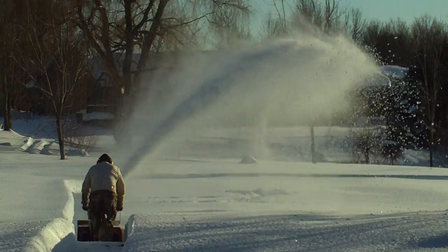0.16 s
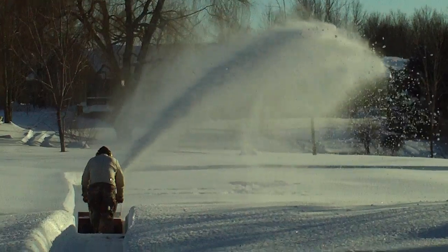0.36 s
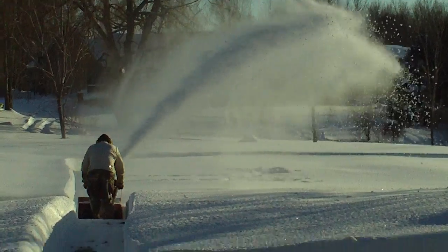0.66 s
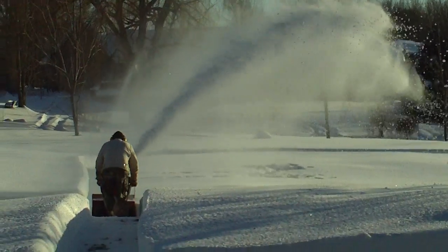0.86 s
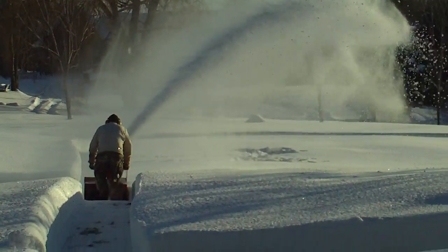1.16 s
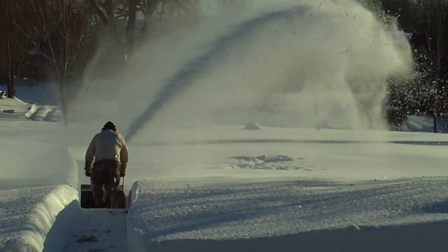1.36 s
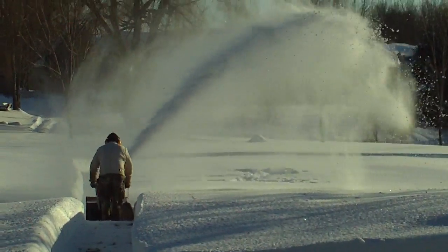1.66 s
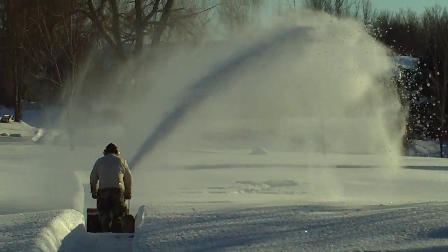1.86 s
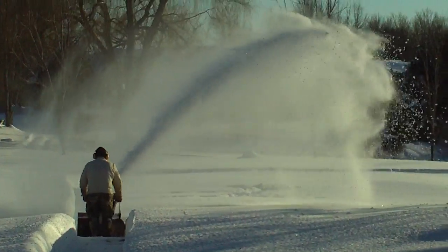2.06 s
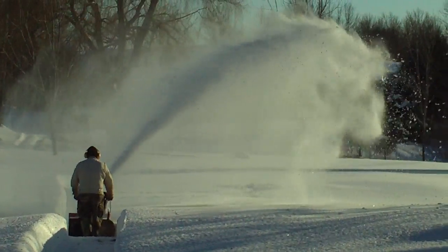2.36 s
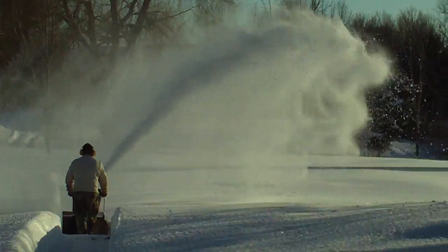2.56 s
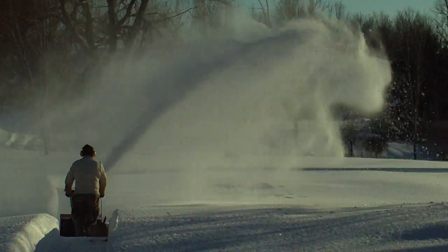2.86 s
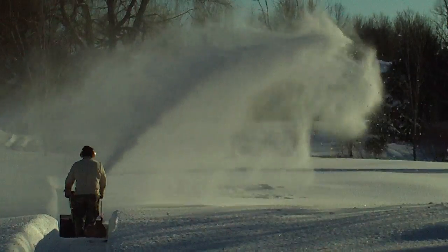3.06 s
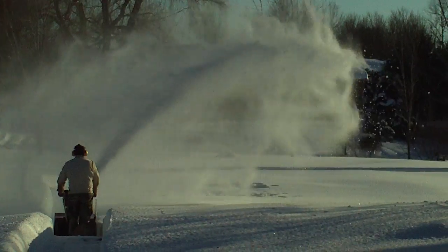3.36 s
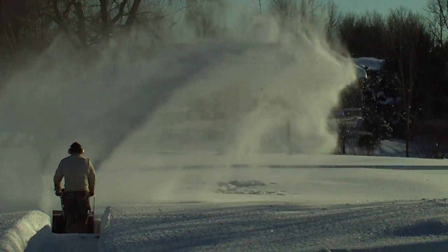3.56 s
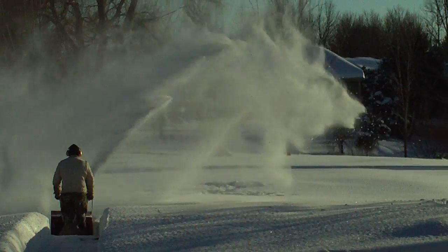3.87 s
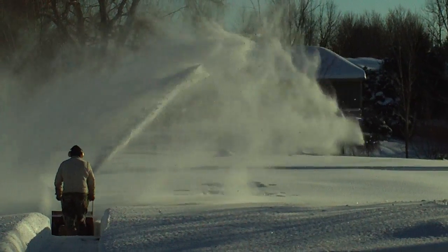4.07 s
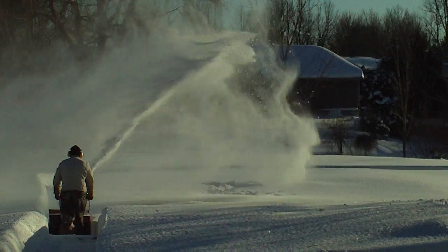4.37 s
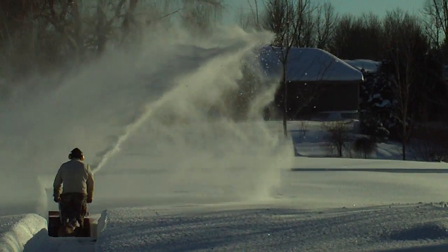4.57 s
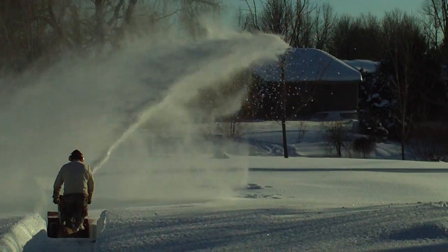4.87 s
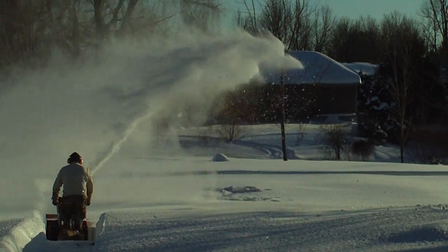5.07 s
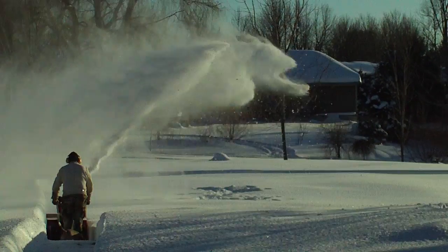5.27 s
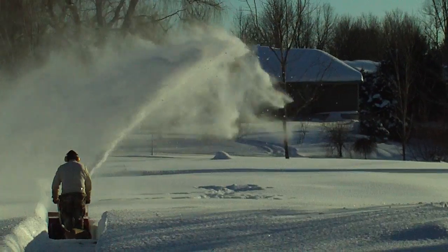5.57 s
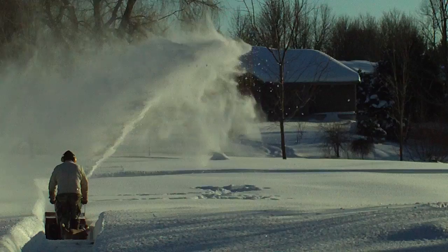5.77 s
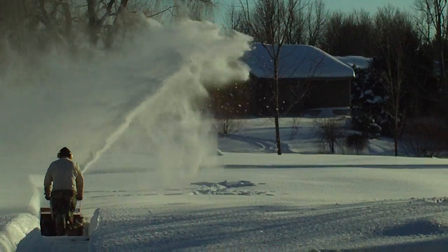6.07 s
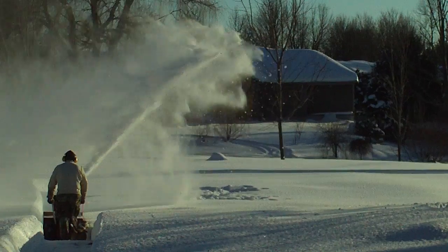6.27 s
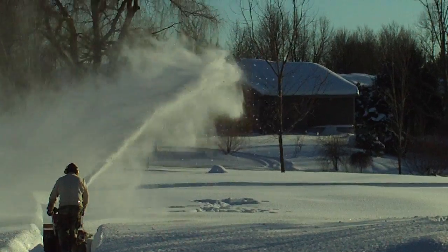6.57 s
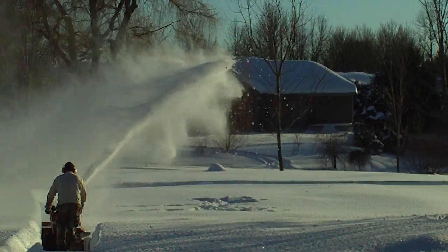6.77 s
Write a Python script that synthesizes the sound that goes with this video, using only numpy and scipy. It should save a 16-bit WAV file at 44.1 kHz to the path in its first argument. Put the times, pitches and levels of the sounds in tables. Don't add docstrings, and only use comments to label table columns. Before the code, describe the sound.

A walk-behind snow blower putters steadily across an open snowy yard, its fast exhaust pops ringing a hollow muffler over a low housing roar and hissing snow. Close at the microphone, gloved hands rub and bump the camera; a dull click lands just before one second and a much louder knock follows about half a second later. The sound is dull on top, with no echo.

```python
import sys
import numpy as np
from scipy import signal
from scipy.io import wavfile
from scipy.ndimage import uniform_filter1d

SR = 44100
rng = np.random.default_rng(int(sys.argv[2]) if len(sys.argv) > 2 else 0)


def boost_factor(decibels):
    exponent = np.asarray(decibels, float) / 20
    return 10 ** exponent


def put_to_file(sound):
    columns = np.atleast_2d(sound).T
    safe = np.clip(columns, -1, 1)
    whole_steps = np.round(safe * 32767)
    wavfile.write(sys.argv[1], SR, whole_steps.astype(np.int16))


N = 305613

# (time [s], engine speed [cycles/s])
ENGINE_SPEED = [(0.0, 26.644), (0.589, 27.319), (0.873, 26.538), (0.916, 27.097), (2.042, 27.445),
                (2.096, 27.059), (2.261, 27.452), (3.305, 27.712), (3.475, 27.338), (3.732, 28.345),
                (3.994, 27.28), (4.34, 27.799), (5.186, 27.737), (5.469, 27.503), (5.654, 28.238),
                (5.71, 27.85), (6.551, 27.77), (6.93, 28.198)]
# (time [s], level [dB])
ENGINE_EFFORT = [(0.0, -2), (0.85, 1.5), (1.5, -1), (1.75, -7.5), (2.14, 0), (2.3, 0), (2.89, 4.5),
                 (3.42, -5), (3.84, 1), (4.15, -4.5), (4.69, -3.5), (4.94, -3.5), (5.15, -0.5), (5.85, -3),
                 (6.14, 2.5), (6.41, -3), (6.7, -0.5), (6.93, 10)]
PRESSURE_SWINGS = [
    (.17, .022, -.6),
    (.28, .06, .4),
    (.475, .022, 1.),
    (.62, .07, -.55),
    (.9, .06, .25),
]
# (multiple of cycle rate [1], rms level [dB])
ENGINE_HARMONICS = [(1, -42), (2, -35), (3, -66.5), (4, -39.5), (5, -37.5), (6, -47), (7, -50.5),
                    (8, -41.5), (9, -48.5), (10, -59), (11, -49), (12, -55), (13, -68)]
# (multiple of blade rate [1], rms level [dB])
BLADE_HARMONICS = [(1, -41), (5, -52)]
# (frequency [Hz], width [Hz], level [dB])
MUFFLER_MODES = [
    (945.7, 36, 1),
    (884, 24, 0),
    (1034, 150, -7),
]
# (time [s], extra level [dB])
HARD_FIRINGS = [(.041, 5), (.608, -0.5), (.93, 4.5), (1.347, -1), (2.771, 5), (2.881, 4), (2.916, 1),
                (4.07, 4.5), (4.145, 7.5), (5.323, 6), (5.694, 8), (6.341, 3), (6.413, 8), (6.915, 2)]
# (frequency [Hz], density [dB/Hz])
SPRAY_SPECTRUM = [(650, -25), (1100, -5), (1560, -9.5), (1760, -8), (2180, -8.5), (2450, -12), (2860, -9),
                  (3160, -16.5), (3520, -14.5), (3750, -11), (4110, -16), (5300, -13), (8000, -18)]
VALVE_PUFFS = [
    (.19, .1, 1.),
    (.455, .1, .55),
    (.82, .09, .55),
]
# (centre [s], half length [s], extra level [dB])
SNOW_DRIFTS = [
    (.3, 0.72, 1),
    (3.2, .7, 2.5),
    (5.9, 0.42, 3),
    (6.93, 0.17, 3),
]
# (frequency [Hz], density [dB/Hz])
HOUSING_SPECTRUM = [(12, -10.5), (35, 5.5), (80, 0), (105, -1), (200, 0), (340, -2), (450, -5.5),
                    (580, -12.5), (760, -6), (1100, -17), (1500, -27)]
# (centre [s], half length [s], rumble level [dB])
PALM_RUBS = [
    (.17, .05, -31),
    (.72, 0.18, -30),
    (3.37, 0.027, -31),
    (5.96, .03, -36.5),
    (6.632, 0.067, -35),
]
# (frequency [Hz], density [dB/Hz])
RUB_SPECTRUM = [(15, -9), (40, 2.5), (110, -1.5), (170, -14.5), (300, -30.5)]
# (time [s], first swing, push + or suck - [full scale], frequency [Hz], length [cycles])
HAND_BUMPS = [(.138, -.043, 70, 1.5), (.158, .04, 62, 2.5), (.603, -.04, 95, 2.5), (.634, .096, 123, 1.5),
              (.645, -.075, 15.5, 1), (.721, .065, 63, .5), (.758, -.048, 26.8, 1), (.857, -.07, 19.5, 1),
              (1.01, .036, 28.6, .5), (1.405, -.085, 18.6, 1), (2.41, -.061, 44.6, 1), (2.734, -.05, 24, 1),
              (3.35, -.08, 22.3, 1), (4.036, -.038, 84, .5), (4.039, .062, 13.6, 1), (5.694, -.072, 53, 1),
              (5.947, -.06, 67, .5), (5.951, .06, 13.8, 1), (6.58, .047, 31, 1), (6.621, -.063, 84, .5),
              (6.657, .056, 56, .5), (6.774, .063, 14.4, 1), (6.829, .072, 29.4, 1)]
# (time [s], peak level [dB], shell frequency [Hz], first push [sign], length [cycles])
SHELL_CLICKS = [
    (.857, -9, 2800, 1, .85),
    (1.40515, -.6, 1500, -1, 1.05),
    (1.4049, -21, 5000, -1, 1.3),
    (.8845, -34, 4200, 1, 4),
    (.890, -35, 2200, 1, 12),
    (1.456, -35, 2500, 1, 1.2),
    (.878, -33, 2800, 1, 1.5),
]
# (delay [s], level [dB])
SHELL_BOUNCES = [
    (0, 0),
    (.0016, -8),
    (.0033, -18),
]
# (frequency [Hz], density [dB/Hz])
BUZZ_SPECTRUM = [(500, -14), (1200, -4), (2400, 0), (3500, -2), (5000, -6), (7500, -4)]
# (frequency [Hz], level [dB], decay by 60 dB [s])
CASE_MODES = [
    (562, -18, 0.023),
    (1010, -17.5, 0.018),
    (1580, -22, 0.017),
    (2360, -19, .022),
]
# (frequency [Hz], gain [dB])
MICROPHONE_RESPONSE = [(5400, 0), (5700, -6), (5950, -7.5), (6300, -13), (6650, -20), (6950, -16.5),
                       (7250, -29), (7600, -69.5)]
# (frequency [Hz], margin [dB])
MUTING_MARGIN = [(2600, -6), (3200, -2.3), (3700, -3.4), (4300, -1.4), (5000, -3.2), (5600, -1.5),
                 (5950, 4), (6300, -1), (6700, 4.5), (7000, -1.5)]

START_CYCLE = .052
RING_DB, HOUSING_DB, SPRAY_DB = -40.5, -39.5, -47
HOUSING_FOLLOWS, SPRAY_FOLLOWS = .05, .068
BELT_RATIO = 2.476
SLIP_TURNS, SLIP_S, BLADE_START = 1.88, 1.4, .35
BUMP_FADE, BUMP_HURRY = .6, .87
BUZZ_DB, BUZZ_FOLLOWS = -24, .45
SUCK_DB, SUCK_FADE = -13, .022
SQUEAK_S, SQUEAK_DB, SQUEAK_RISE, SQUEAK_FALL = 1.185, -42, 300, 180


def evened(x):
    return x / np.sqrt(np.mean(abs(x) ** 2) + 1e-20)


def add(mix, s, sound):
    part = mix[round(s * SR):][:len(sound)]
    part += sound[:len(part)]


def drift(per_s):
    steps = rng.standard_normal(round(N / SR * 80))
    return evened(np.interp(np.arange(N) / SR * per_s, np.arange(len(steps)), steps))


def resonate(x, hz, width):
    r = np.exp(-np.pi * width / SR)
    return 2 * signal.lfilter([1 - r], [1, -r * np.exp(2j * np.pi * hz / SR)], x).real


def noise(spectrum, patchy_db, size=1024, count=N):
    hz = np.fft.rfftfreq(size, 1 / SR)
    f, db = np.transpose(spectrum)
    a, b, patches = rng.standard_normal((4 * count // size + 5, len(hz), 3)).T
    patches = uniform_filter1d(patches, size=9, axis=0)
    patches = evened(uniform_filter1d(patches, size=9, axis=1))
    envelope_db = np.interp(np.log(hz + 1), np.log(f + 1), db, right=-90)
    shape = boost_factor(envelope_db[:, None] + patchy_db * patches)
    sound = signal.istft((a + 1j * b) * shape, nperseg=size, noverlap=3 * size // 4)[1]
    return evened(sound[:count])


def since(turns, place):
    return (turns - place) % 1, np.floor(turns - place + 1).astype(int)


def engine_hum(turns):
    place, width, push = np.transpose(PRESSURE_SWINGS)
    out = 0
    for k, db in ENGINE_HARMONICS:
        spread = np.exp(-2 * (np.pi * k * width) ** 2 - 2j * np.pi * k * place)
        phase = np.angle(np.sum(push * width * spread))
        waver = .012 * k * drift(per_s=14)
        level = boost_factor(db + .12 * k * drift(per_s=8))
        out = out + level * np.sqrt(2) * np.cos(2 * np.pi * k * turns + phase + waver)
    return out


def impeller(turns):
    slip = SLIP_TURNS * np.exp(-np.arange(N) / SR / SLIP_S)
    beat = BELT_RATIO * turns + BLADE_START + slip + .04 * drift(per_s=5)
    out = 0
    for k, db in BLADE_HARMONICS:
        out = out + boost_factor(db + 2.5 * drift(per_s=5)) * np.sqrt(2) * np.cos(2 * np.pi * k * beat)
    return out


def muffler(turns, level_db):
    gone, cycle = since(turns + .0035 * drift(per_s=25), .477)
    strength_db = .71 * np.clip(rng.standard_normal(N // 1000), -3, 1.2)
    for s, db in HARD_FIRINGS:
        strength_db[cycle[round((s + .008) * SR)]] = db
    strength = boost_factor(strength_db)[cycle]
    pops = strength * (np.diff(np.maximum.accumulate(cycle), prepend=cycle[0]) > 0)
    knocks = 0
    for place, share in [(.977, .45), (.124, .25)]:
        knock_cycle = since(turns + .004 * drift(per_s=25), place)[1]
        knocks = knocks + share * (np.diff(knock_cycle, prepend=0) > 0)
    blows = np.roll(pops + knocks, -round(.0002 * SR))
    struck = resonate(blows, *MUFFLER_MODES[0][:2]) + .27 * resonate(blows, 960, 220)
    rush = (2.3 + .33 * strength * np.exp(-gone / .073)) * rng.standard_normal(N)
    gas_hum = sum(boost_factor(db) * resonate(rush, hz, width) for hz, width, db in MUFFLER_MODES)
    struck = evened(resonate(struck, 830, 330))
    gas_hum = evened(resonate(gas_hum, 830, 330))
    crack = signal.oaconvolve(pops, signal.windows.hann(30), "same")
    crack = crack - uniform_filter1d(crack, size=150)
    gas_db = -43 + .39 * (level_db + 45)
    return boost_factor(level_db - 3) * struck + boost_factor(gas_db) * gas_hum + boost_factor(-39) * crack


def snow_spray(turns, level_db):
    swell = 1
    for place, decay, strength in VALVE_PUFFS:
        gone, cycle = since(turns, place)
        chance = .55 + .45 * np.minimum(rng.exponential(1, N // 1000), 2.5)
        swell = swell + .7 * strength * chance[cycle] * np.exp(-gone / decay)
    lumps = boost_factor(.88 * drift(per_s=65))
    hiss = noise(SPRAY_SPECTRUM, patchy_db=-1.0, size=256)
    return boost_factor(level_db + .9) * evened(hiss * swell * lumps ** .088)


def housing(turns, level_db):
    gone, _ = since(turns, .48)
    roar = noise(HOUSING_SPECTRUM, patchy_db=1.5, size=2048)
    return boost_factor(level_db + 4) * evened(roar * (1 + .22 * np.exp(-gone / .69)))


def palm_rubs():
    t = np.arange(N) / SR
    strokes = sum(boost_factor(db) * np.exp(-((t - s) / half) ** 2) for s, half, db in PALM_RUBS)
    return noise(RUB_SPECTRUM, patchy_db=3.5, size=2048) * strokes


def hand_bumps():
    out = np.zeros(N)
    for s, push, hz, cycles in HAND_BUMPS:
        gone = np.arange(0, cycles, hz / SR)
        swing = np.sin(2 * np.pi * cycles * (gone / cycles) ** BUMP_HURRY)
        add(out, s, push * np.exp(-BUMP_FADE * gone) * swing)
    return out


def shell_clicks():
    out = np.zeros(N)
    t = np.arange(-300, 900) / SR
    for s, db, hz, sign, cycles in SHELL_CLICKS:
        for k, (delay, drop_db) in enumerate(SHELL_BOUNCES):
            tone = np.cos(2 * np.pi * hz * t) * np.exp(-(t * hz * 1.7 / cycles) ** 2)
            add(out, s + delay + t[0], sign * (-1) ** k * boost_factor(db + drop_db) * tone)
        buzz = noise(BUZZ_SPECTRUM, patchy_db=0, size=256, count=len(t))
        buzz = buzz * boost_factor(BUZZ_DB + BUZZ_FOLLOWS * db - 60 * t / .018) * np.clip(t / .0004 + 1.5, 0, 1)
        softer_db = SUCK_FADE * db ** 2
        suck = boost_factor(SUCK_DB - softer_db - 60 * t / .016) * np.clip(t / .0005 - .6, 0, 1)
        knock = 0
        for f, mode_db, t60 in CASE_MODES:
            knock = knock + boost_factor(mode_db - softer_db - 60 * t / t60) * np.sin(2 * np.pi * f * t)
        add(out, s + t[0], buzz - suck - knock * (t > 0))
    late = np.arange(N) / SR - SQUEAK_S
    squeak = evened(resonate(rng.standard_normal(N), 2080, 270))
    return out + squeak * boost_factor(SQUEAK_DB + np.minimum(SQUEAK_RISE * late, -SQUEAK_FALL * late))


def scene():
    t = np.arange(N) / SR
    turns = START_CYCLE + np.cumsum(np.interp(t, *np.transpose(ENGINE_SPEED))) / SR
    effort_db = np.interp(t, *np.transpose(ENGINE_EFFORT))
    depth_db = sum(db * np.exp(-((t - s) / half) ** 2) for s, half, db in SNOW_DRIFTS)
    machine = engine_hum(turns) + impeller(turns) + muffler(turns, RING_DB + effort_db)
    machine = machine + snow_spray(turns, SPRAY_DB + SPRAY_FOLLOWS * effort_db + depth_db)
    machine = machine + housing(turns, HOUSING_DB + HOUSING_FOLLOWS * effort_db)
    hands = palm_rubs() + hand_bumps() + shell_clicks()
    return (machine + hands)[None]


def low_pass(x):
    return signal.sosfilt(signal.butter(12, 7090, fs=SR, output="sos"), x)


def record(dry):
    hz, _, z = signal.stft(np.clip(dry, -.96, .96), SR, nperseg=2048, noverlap=1024)
    z = z * boost_factor(np.interp(hz, *np.transpose(MICROPHONE_RESPONSE), right=-120))[:, None]
    power = uniform_filter1d(abs(z) ** 2, size=3, axis=1)
    power = uniform_filter1d(power, size=2, axis=2)
    band_db = 10 * np.log10(abs(power) + 1e-30)
    usual_db = signal.medfilt2d(band_db[0], (1, 15))[None]
    usual_db = uniform_filter1d(usual_db, size=5, axis=1) - .4
    margin_db = np.interp(hz, *np.transpose(MUTING_MARGIN), left=-99)[:, None]
    keep = np.clip(band_db - usual_db - margin_db + .5, .003, 1)
    kept = signal.istft(z * keep, SR, nperseg=2048, noverlap=1024)[1][:, :N]
    return low_pass(kept)


dry = scene()
out = record(dry)
put_to_file(out)
```